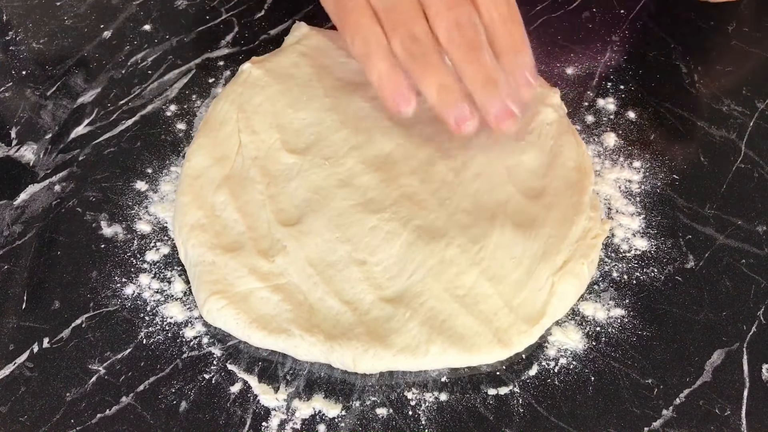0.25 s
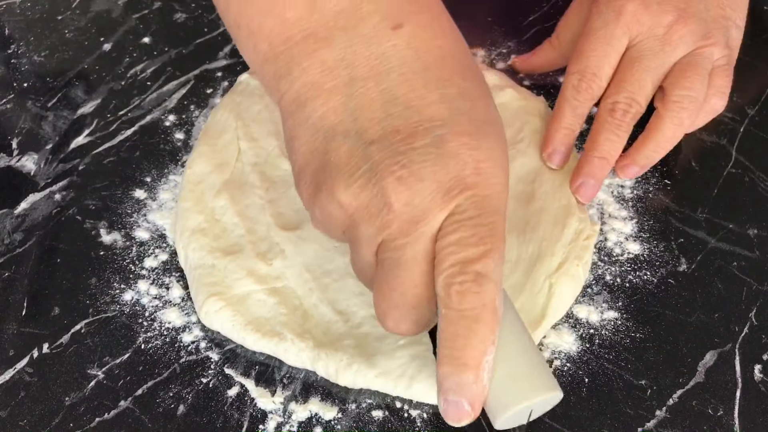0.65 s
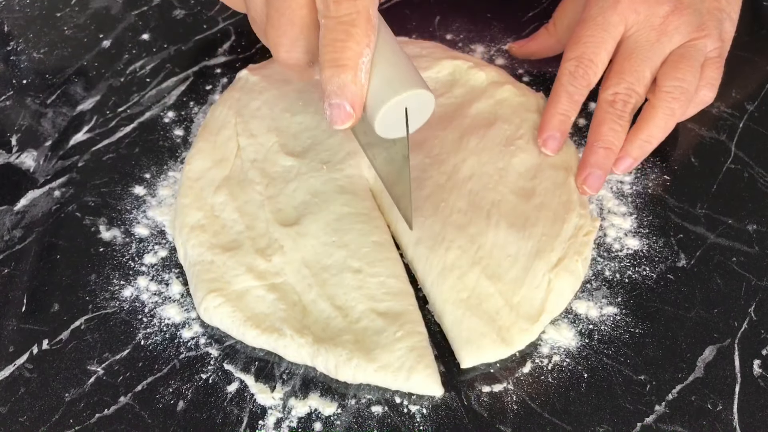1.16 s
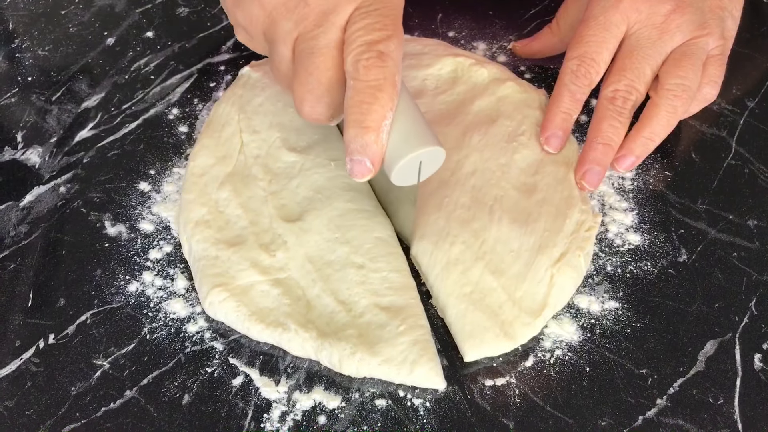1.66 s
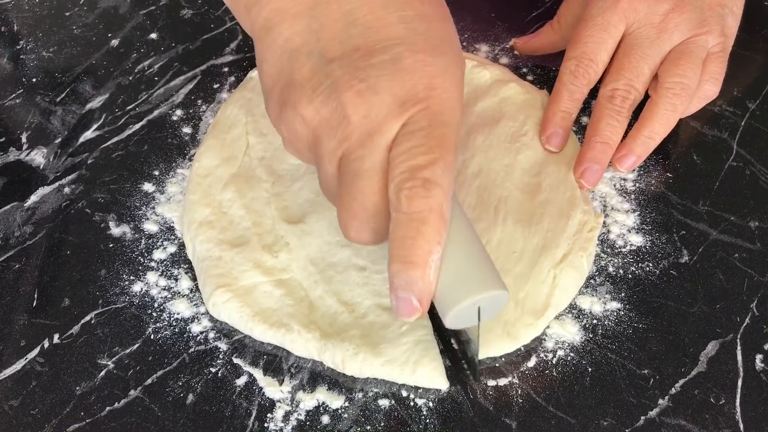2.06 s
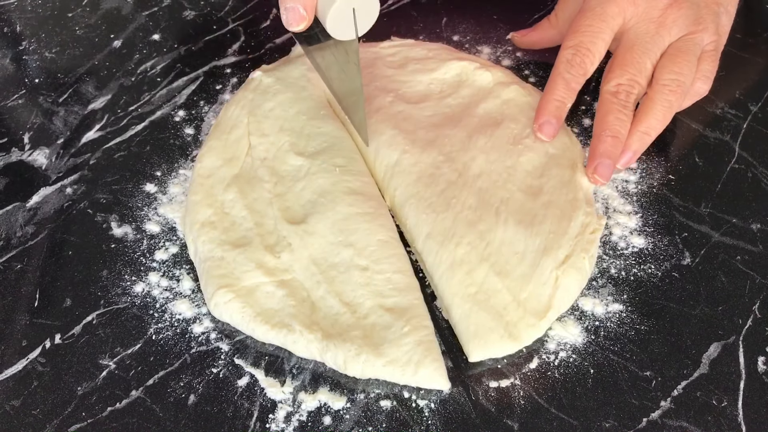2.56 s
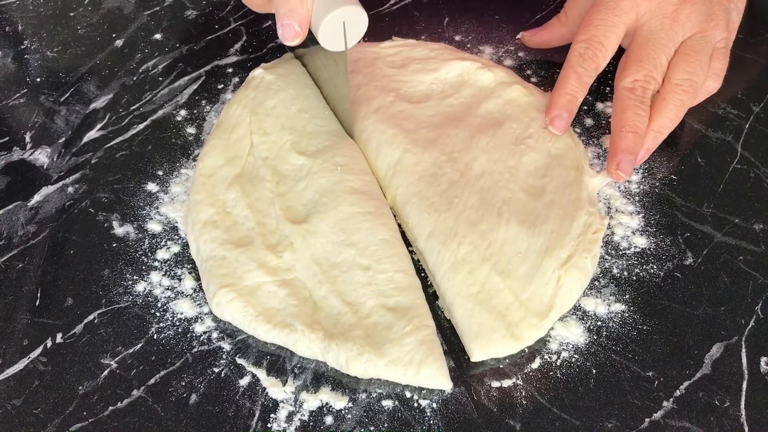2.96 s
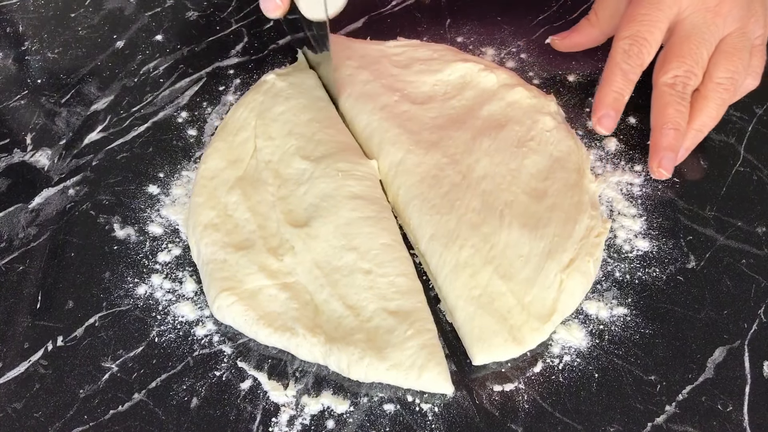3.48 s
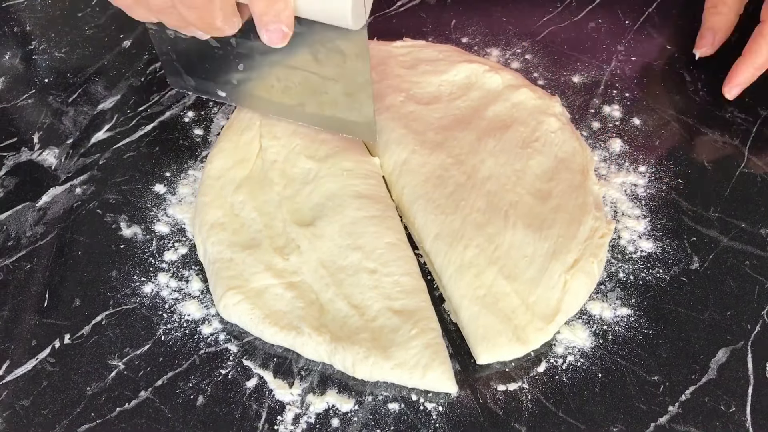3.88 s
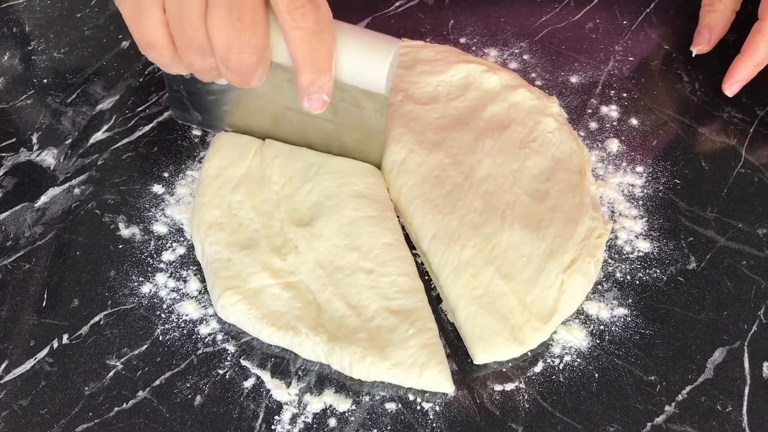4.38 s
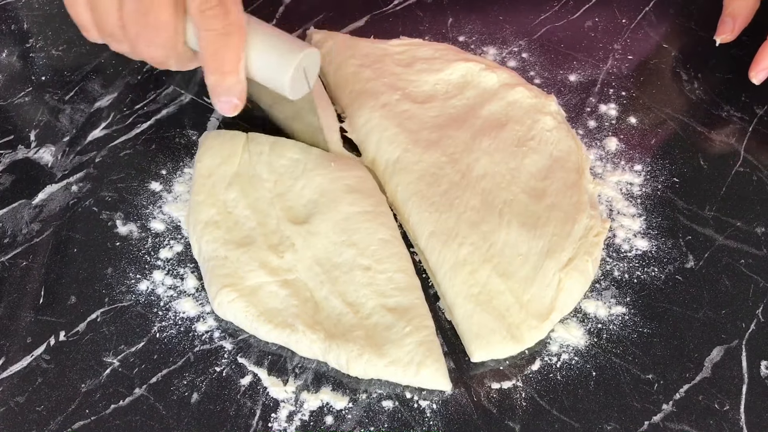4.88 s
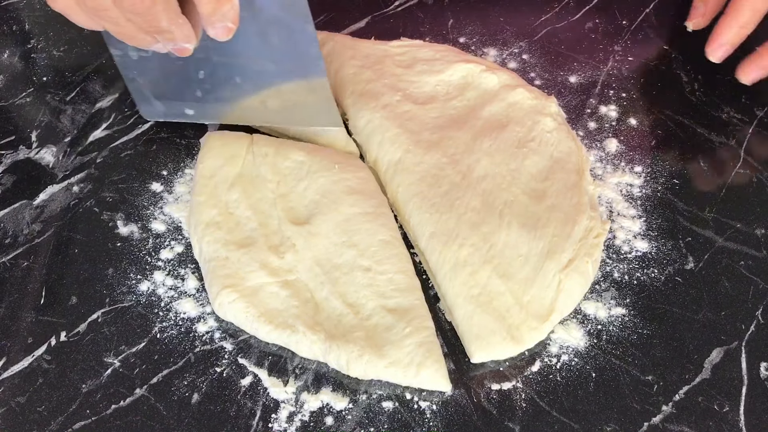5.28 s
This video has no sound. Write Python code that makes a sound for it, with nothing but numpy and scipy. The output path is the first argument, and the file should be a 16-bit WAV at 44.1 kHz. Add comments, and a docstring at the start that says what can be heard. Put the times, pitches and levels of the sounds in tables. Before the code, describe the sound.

A soft pat opens, followed by quick dry swishes of a blade through floured dough and a smoother fading slide. One sharp knock stands far above the rest, then come scrapes, a lighter tap at three seconds, a cluster of muffled bumps and sticky clicks, and a short metallic scratch near the end. Close microphone, small room, quiet appliance hum.

```python
"""A steel bench scraper cuts soft dough on a floured stone counter in a quiet kitchen.
Quick drags open the scene as grain friction through moving resonances; the flat blade then slides out.
One hard knock at 1.6 s rings the counter's decaying modes, more drags follow, and soft knocks crowd the end.
Near 5.2 s the bare blade slides free and slips on stone ring its plate modes, before the last drags.
Under it all lie fluttering low noise, an appliance hum and hiss, made of filtered noise."""
import sys
import numpy as np
from scipy import signal
from scipy.fft import rfft, irfft, next_fast_len
from scipy.io import wavfile
from scipy.ndimage import uniform_filter1d

SR = 44100
rng = np.random.default_rng(int(sys.argv[2]) if len(sys.argv) > 2 else 0)


def file_out(sig):
    """Save sig as 16-bit WAV at sys.argv[1]."""
    # one column per channel
    cols = np.atleast_2d(sig).T
    # limit, then scale
    lim = np.clip(cols, -1, 1)
    pcm = np.round(lim * 32767).astype(np.int16)
    wavfile.write(sys.argv[1], SR, pcm)


N = 244314


def drags():
    """Granular friction: grain noise through a moving bright resonance, part of it ringing the blade."""
    # Strokes over dough and flour, and the noisy tails of the pat at 0.056 s and the knock at 1.645 s. Each
    # row: time the top is reached, rise for 20 dB, hold and fall for 20 dB in seconds, hiss level in dB, dull
    # rub, counter body and blade ring in dB re hiss, bright resonance in Hz, rasp and treble from 8.6 to 14 kHz
    # in dB re hiss.
    drag_rows = [(0.001, .01, 0.0043, 0.1, -66, -2, 2, -11, 3870, -3, -9),
                 (0.056, 0.0068, 0.0019, 0.069, -58.5, -3, -2.5, -25, 4230, -5, -8),
                 (0.115, .05, 0.066, 0.12, -70.5, 9, 3, -13, 4300, -1, -8),
                 (0.2, 0.075, .03, 0.06, -74, -6, -1, -7, 4700, 7, -13),
                 (0.296, 0.17, 0.024, 0.0069, -57, -12.5, -9.5, -5.5, 4940, -7, -11.5),
                 (0.35, 0.027, 0.0081, 0.073, -71.5, 3, -7, -6, 4250, -1, -7),
                 (0.527, 0.1, 0.018, 0.097, -57, 2, -5, -2.5, 3040, 0.5, -8.5),
                 (0.575, .04, .01, 0.053, -59, -8, -9, -13, 5000, -5, -13),
                 (0.65, 0.12, .015, 0.07, -61.5, -3.5, -5, -5, 4020, -2, -12),
                 (0.725, 0.057, 0.017, 0.037, -65, -3, -2.5, -1, 3730, -2.5, -5),
                 (1.624, 0.099, 0.014, .02, -72, 4, 9.5, -5, 4000, -5, -10),
                 (1.659, 0.034, .005, 0.22, -63, 0, 15.5, -19, 3200, 6.5, -16),
                 (1.789, 0.13, 0.0053, 0.086, -65.5, -1, 7.5, -12, 4470, 1.5, -7.5),
                 (1.855, 0.038, 0.061, 0.079, -60.5, -6, 1, -5, 3960, -5, -9.5),
                 (1.956, 0.15, 0.074, 0.064, -58.5, 3, 2.5, -9, 3680, -0.5, -11),
                 (2.044, 0.056, 0.087, 0.041, -66.5, 1.5, -2, -4, 3760, 0.5, -10),
                 (3.177, 0.19, 0.044, 0.076, -60, -3.5, -1.5, -8, 4130, -3, -12.5),
                 (3.356, 0.07, 0.023, 0.31, -60, 1.5, -1, -13, 4160, 0, -13),
                 (3.44, 0.037, 0.047, 0.12, -50.5, -5.5, -10, -8, 4330, -5.5, -10),
                 (3.53, 0.093, 0.051, 0.02, -52.5, -4, -10, -20, 6240, -6, -7),
                 (3.619, 0.048, .004, 0.1, -55, -4.5, -0.5, -11, 4230, -9, -9.5),
                 (3.7, 0.13, 0.08, 0.14, -73.5, 3, 0, 2, 4170, 4, -12),
                 (3.868, 0.18, 0.042, 0.013, -72, 5.5, -1, -20, 3999, 2.5, -11),
                 (3.954, .1, 0.16, .1, -97, 2, -8, 1, 4000, -4, -10),
                 (4.286, 0.19, 0.23, 0.11, -76.5, -7, 7.5, -4, 4335, -10, -7),
                 (4.611, 0.085, 0.055, 0.09, -67.5, -3, 5, -15, 3160, 3, -10.5),
                 (4.72, 0.033, 0.0082, 0.11, -65.5, 2, 7, -13, 3500, 3.5, -23),
                 (4.82, 0.053, 0.082, 0.046, -61.5, 0.5, 1.5, -4, 5350, -0.5, -5),
                 (4.99, 0.28, 0.012, 0.047, -61.5, 2.5, 2, -11, 4000, 0, -13),
                 (5.036, 0.055, 0.07, .05, -66, 1, 5, -27, 3670, 3, -13),
                 (5.129, 0.1, 0.022, 0.07, -58.5, -5.5, -3.5, -13, 4300, -3, -9.5),
                 (5.279, 0.075, .01, 0.18, -63.5, -4, -1.5, -10, 3320, -2.5, -14),
                 (5.53, 0.3, .01, .1, -66, -8, -0.5, -4.5, 4870, -2, -6.5)]
    # Spectrum of the friction. Each row: frequency in Hz, relative level in dB per Hz.
    drag_colour = [(240, 2.5), (400, -2), (570, -1.5), (826, 0.5), (1400, 3.5), (2180, -7), (2550, -5),
                   (2800, -1.5), (4050, -2), (5600, -3.5), (7170, -6.5), (8370, -12), (12700, -21),
                   (16000, -14)]
    resonance_db, resonance_octaves = 13.5, 1.04   # height and spread of the bright resonance

    power = strokes(drag_rows) ** 2
    total = power.sum(axis=0)
    # the mean weighted by power lets the loudest stroke set the colour
    colour = np.transpose(drag_rows)[5:] @ power / total
    dull_db, body_db, ring_db, centre_hz, rasp_db, treble_db = map(every_sample, colour)
    friction = coloured(grains(12000, uneven_db=2.5), drag_colour)

    hiss = 0
    edges = np.geomspace(2200, 7800, num=10)
    for low, high in zip(edges, edges[1:]):
        # the free length of blade sets which range stands out
        octaves = np.log2(np.sqrt(low * high) / np.maximum(centre_hz, 1))
        lift_db = resonance_db * np.exp(-(octaves / resonance_octaves) ** 2)
        hiss = hiss + amp(lift_db + 1.1 * drift(25)) * band(friction, low, high)
    # even out the hiss over 4000 samples, then let it flicker
    hiss_level = np.sqrt(uniform_filter1d(hiss ** 2, size=4000) + 1e-12)
    layers = amp(1.9 * drift(32)) * hiss / hiss_level
    layers += amp(dull_db + 1.3 * drift(13.0)) * rms_one(band(friction, 840, 1456))
    layers += amp(rasp_db + 1.14 * drift(17)) * rms_one(band(friction, 1503, 2345))
    layers += amp(body_db + 1.0 * drift(7.3)) * rms_one(band(friction, 358, 923))
    layers += amp(treble_db + 1.8 * drift(32)) * rms_one(band(friction, 8560, 14100))
    layers += amp(ring_db) * rms_one(blade(grains(6000, uneven_db=2.0)))
    return every_sample(np.sqrt(total)) * layers


def singing():
    """Resonance under friction: held by dough, the dragged blade sings briefly in narrow ranges."""
    # Each row: time the top is reached, rise for 20 dB, hold and fall for 20 dB in seconds,
    # level in dB, centre in Hz, width in Hz.
    sung_rows = [(0.26, 0.055, .04, 0.019, -68, 4700, 69), (0.51, .02, 0.043, 0.033, -64, 1400, 120),
                 (0.57, .03, 0.029, .04, -76, 1900, 40), (0.52, .03, 0.031, .04, -63, 2400, 220),
                 (0.55, .04, .04, .03, -70, 4200, 140), (0.5, .03, 0.059, .06, -63, 5700, 250),
                 (0.68, 0.018, 0.013, 0.018, -71, 2800, 290), (1.87, .02, .02, .03, -68, 3500, 200),
                 (1.976, 0.044, 0.022, .05, -59, 915, 110), (2.013, 0.018, .015, 0.026, -61, 3320, 130),
                 (1.988, .05, 0.037, .04, -65, 4600, 150), (3.195, 0.11, 0.024, 0.044, -80, 1800, 180),
                 (3.435, 0.034, .05, .05, -60, 1700, 200), (3.345, .03, .03, .05, -66, 4440, 200),
                 (3.433, .02, 0.024, .04, -60, 2470, 100), (3.442, .02, .05, .04, -63, 3900, 55),
                 (3.435, 0.018, 0.044, 0.033, -55.5, 4300, 60), (3.435, 0.023, 0.017, .03, -62, 6500, 91),
                 (3.517, .03, 0.051, .03, -68, 5900, 120), (3.518, .02, 0.045, 0.028, -62, 6800, 300),
                 (4.82, .02, .03, .04, -70, 5720, 200), (4.83, .03, 0.098, .03, -71, 2400, 550),
                 (4.86, .05, 0.054, .03, -71, 6600, 300), (4.89, .03, .03, .03, -68, 3000, 130),
                 (4.99, .02, .02, .03, -70, 4400, 180), (4.53, 0.033, 0.047, 0.026, -69, 760, 65),
                 (3.63, .015, 0.018, 0.045, -74, 1850, 170), (5.07, .03, .08, .03, -67, 4300, 150),
                 (4.76, 0.026, 0.036, .03, -62, 600, 160)]
    friction = grains(9000, uneven_db=2.0)
    out = np.zeros(N)
    for gain, (*_, hz, width_hz) in zip(strokes(sung_rows), sung_rows):
        tone = ring(friction, hz, t60_of_width(max(width_hz, 10)))
        out += every_sample(gain) * rms_one(tone)
    return out


def slides():
    """Smooth friction: noise in a few steady resonances as the flat of the blade leaves the cut faces."""
    # Each row: time the top is reached, rise for 20 dB, hold and fall for 20 dB in seconds, level in dB.
    slide_rows = [(0.78, 0.026, 0.31, 0.28, -68), (2.38, 0.93, 0.072, 0.14, -73.5)]
    # Each row: resonance in Hz, width in Hz, relative level in dB.
    slide_colour = [(1060, 490, 4), (2560, 430, -1.5), (4170, 450, -1.5), (6000, 620, -7)]
    noise = rng.standard_normal(N)
    tones = np.zeros(N)
    for k, (hz, width_hz, db) in enumerate(slide_colour):
        tones += (-1) ** k * amp(db) * rms_one(ring(noise, hz, t60_of_width(width_hz)))
    return every_sample(strokes(slide_rows).sum(axis=0)) * rms_one(tones)


def zing():
    """Stick-slip of bare steel on stone: dense slips ring every plate mode, with raw scratch between."""
    # The free blade slides along the stone. Each row: time in seconds, ring level in dB.
    zing_level = [(5.185, -82), (5.198, -64), (5.208, -53), (5.214, -52), (5.217, -46), (5.229, -47),
                  (5.2325, -35), (5.237, -46.5), (5.244, -43.5), (5.254, -45), (5.262, -54), (5.285, -78)]
    slips = grains(8000, uneven_db=2.0)
    gain = amp(in_time(zing_level, -130)[0])
    ringing = blade(gain * slips) / np.std(blade(slips))
    scratch = amp(-19.0) * gain * rms_one(band(slips, 2500, 11400))
    return ringing + scratch


def blade(x):
    """Modal plate: the steel's resonances ring in parallel, signs alternating."""
    # Each row: mode in Hz, width in Hz, relative level in dB.
    plate_modes = [(531, 11, -9), (805, 37, -9.5), (1156, 46, -10), (1600, 41, -19), (1792, 22, -8.5),
                   (2073, 24, -8), (2257, 50, -7.5), (2610, 47, -4.5), (3045, 54, -7), (3220, 38, -4),
                   (3676, 37, -12.5), (3680, 20, -0.5), (4000, 15, -10), (4090, 29, -2.5), (4450, 150, -7),
                   (4430, 33, -15.5), (4860, 44, -1.5), (5090, 14, -8.5), (5225, 43, 0), (5470, 42, -10),
                   (5535, 40, -3.5), (5780, 120, -25), (6045, 47, -6), (6360, 100, -8), (7100, 30, -13),
                   (7500, 52, -9), (8600, 66, -28), (9130, 36, -15.5), (10000, 35, -24), (10300, 32, -26)]
    out = np.zeros(N)
    for k, (hz, width_hz, db) in enumerate(plate_modes):
        # the root of the width gives narrow and wide modes like power under noise
        out += (-1) ** k * amp(db) * np.sqrt(width_hz) * ring(x, hz, t60_of_width(width_hz))
    return out


def knocks():
    """Modal impact: blows ring counter and handle; longer contact dulls them and dough damps them."""
    # Edge on counter. Each row: start in seconds, relative level of the blow in dB, relative level of
    # the tick in dB re the blow, contact in ms, t60 of damping by dough in seconds, favoured pitch in Hz.
    knock_rows = [(0.056, -49.5, -10.5, 2, 0.043, 397), (0.318, -50.5, -22, 0.71, 0.19, 603),
                  (1.645, -21, -28, 0.43, 0.58, 426), (1.6522, -40, -33, 0.68, 0.047, 740),
                  (1.987, -41.5, -30, 0.91, 0.29, 560), (2.497, -48.5, -35, 1.42, 0.18, 610),
                  (3.005, -33.5, -35.5, 1.7, 0.32, 526), (3.627, -40.5, -18, 1.01, 0.16, 570),
                  (4.275, -47, -41, 1.6, 0.088, 486), (4.29, -38.5, -36, 2.7, 0.45, 434),
                  (4.424, -46, -35, 2, 0.11, 540), (4.438, -40, -35, 2.1, 0.072, 647),
                  (4.469, -42.5, -26.5, 1.5, 0.032, 610), (4.7035, -47.5, -30, 1.2, 0.04, 695),
                  (4.7235, -43.5, -23, 1.3, 0.17, 570), (4.74, -53, -30, 1.1, 0.11, 530),
                  (4.797, -46.5, -32, 1.1, 0.085, 690), (4.883, -48, -27, 0.68, 0.22, 550),
                  (5.004, -44.5, -18, 2, 0.13, 470), (5.033, -46, -17, 0.66, 0.24, 586)]
    # Counter and cabinet. Each row: mode in Hz, relative level in dB, t60 in seconds.
    counter_modes = [(208.5, -6.5, 0.22), (263, -8.5, 0.2), (418.2, 1, 0.5), (455.4, -7, 0.94),
                     (538, -0.5, 0.22), (662, -6, 0.53), (720, -18, 0.22), (758, -10, 0.26),
                     (768, -7, 0.83), (783, 2, 0.1), (883, -1, 0.15), (1010, -16, 0.083), (1083, -18, 0.13),
                     (1140, -17, 0.3), (1151, -11, 0.44), (1210, -14, 0.23), (1300, -11, 0.22),
                     (1480, -18, 0.2), (2350, -30, .06)]
    # Short knock of handle and blade. Each row: mode in Hz, relative level in dB, t60 in seconds.
    handle_modes = [(1120, 7, 0.016), (716, -5.5, 0.064), (1193, 6.5, 0.01), (293, -16, 0.064),
                    (1750, 0, 0.01), (2320, -13, 0.019), (1497, -3.5, 0.026), (3040, -18.5, 0.043),
                    (3930, -8, 0.015)]
    base_handle_db, handle_loss_db_per_ms = 16.5, 32   # the handle weakens as the contact softens
    # the more dough damps a blow, the more one pitch stands out
    free_t60_s, favour_db_per_halving, favour_octaves = 0.52, 4.5, 0.44

    out = np.zeros(N + SR)
    t = np.arange(SR // 3) / SR
    for s, db, _, contact_ms, damp_t60, favoured_hz in knock_rows:
        damp_t60 = max(damp_t60, .01)
        modes = np.array(counter_modes, float)
        # the spot that is hit favours the modes near one pitch
        favour_db = favour_db_per_halving * np.log2(free_t60_s / damp_t60)
        octaves = np.log2(modes[:, 0] / favoured_hz)
        modes[:, 1] += favour_db * (2 * np.exp(-(octaves / favour_octaves) ** 2) - 1)
        blow = amp(-14.0) * struck(modes, t, spread_db=-0.9) * amp(-60 * t / damp_t60)
        handle_db = base_handle_db - handle_loss_db_per_ms * contact_ms
        onset = 1 - np.exp(-t / 0.0013)
        blow += amp(handle_db) * struck(handle_modes, t, spread_db=-0.1) * onset
        # the longer the contact, the lower the low-pass corner
        contact = signal.butter(2, 1e3 / max(contact_ms, .1), fs=SR, output="sos")
        blow = signal.sosfilt(contact, blow)
        out[round(s * SR):][:len(t)] -= amp(db) * blow   # the blow first swings downward
    s, db, tick_db = np.transpose(knock_rows)[:3]
    return out[:N] + tick(strikes(s, db + tick_db + 17.0))


def struck(modes, t, spread_db):
    """Modal superposition: decaying sines, signs alternating, strengths changing from blow to blow."""
    hz, db, t60 = np.transpose(modes)[:, :, None]
    signs = (-1) ** np.arange(len(hz))[:, None]
    strength = signs * amp(db + spread_db * rng.standard_normal(hz.shape))
    return np.sum(strength * amp(-60 * t / t60) * np.sin(2 * np.pi * hz * t), axis=0)


def tick(clicks):
    """Impulse response of an edge tick: a crack of milliseconds, a faint noisy tail, a little blade ring."""
    t = np.arange(SR // 5) / SR
    decay = np.exp(-t / 0.0014) + amp(-14) * np.exp(-t / 0.015)
    crack = rng.standard_normal(len(t)) * decay
    bright = band(signal.fftconvolve(clicks, crack)[:N], 1150, 5600)
    return band(bright, 730, 7000) + amp(-42.5) * blade(clicks)


def ticks():
    """Impulse excitation: edge ticks and dough letting go, each a crack plus a short pitched ping."""
    # Each row: start in seconds, relative level in dB, ring in Hz, t60 of the ring in seconds.
    tick_rows = [(0.9036, -61, 2544, 0.012), (1.789, -55, 4800, .02), (1.859, -61, 3550, .02),
                 (3.2667, -56, 4800, 0.0079), (3.005, -58, 3270, .015), (3.6283, -55, 3960, 0.17),
                 (3.634, -54, 3260, 0.096), (3.909, -67, 2330, .01), (4.121, -60, 5400, .01),
                 (4.565, -61, 2960, .03), (4.587, -61, 2940, .03), (4.608, -55, 2980, .02),
                 (4.6133, -50, 3080, 0.022), (4.631, -56, 3040, 0.013), (4.637, -49, 3050, 0.02),
                 (4.72, -57, 3420, .015), (4.656, -57, 2930, 0.018), (4.684, -56, 3100, .02),
                 (5.139, -51, 3570, 0.019), (5.1395, -50, 6200, .015), (5.2155, -51, 5170, .02),
                 (5.2315, -38, 3660, .03)]
    s, db = np.transpose(tick_rows)[:2]
    cracks = tick(strikes(s, db + 0.5))
    pings = sum(ring(strikes([s], db - 0.5), hz, t60) for s, db, hz, t60 in tick_rows)
    return cracks + pings


def snaps():
    """Sudden release: sticky dough parts with about a millisecond of thin, high crackle."""
    # Each row: start in seconds, relative level in dB.
    snap_rows = [(0.6315, -74), (1.6245, -61), (1.63, -57), (1.6365, -62), (1.6445, -52), (1.66, -62),
                 (2.9873, -59), (3.266, -67), (4.124, -57), (4.25, -60), (4.29, -66), (4.404, -63),
                 (4.471, -61), (4.485, -59), (4.6828, -58), (4.718, -58), (4.806, -62), (5.035, -55),
                 (5.2096, -51)]
    t = np.arange(SR // 100) / SR
    crack = rng.standard_normal(len(t)) * np.exp(-t / 0.00095)
    s, db = np.transpose(snap_rows)
    return band(signal.fftconvolve(strikes(s, db), crack)[:N], 3600, 15000)


def thumps():
    """Damped low resonance: the hand leans on the dough and the counter thumps."""
    # Each row: start in seconds, relative level in dB, pitch in Hz, t60 in seconds.
    thump_rows = [(.057, -29, 116, 0.011), (0.619, -46, 98.5, 0.15), (4.271, -48, 200, 0.12),
                  (4.297, -48, 232, 0.059), (4.349, -47.5, 229, 0.057), (4.546, -43, 58.6, 0.17),
                  (4.766, -48.5, 104, 0.13), (4.861, -42.5, 92, 0.092), (4.9, -49.5, 210, 0.094),
                  (5.02, -51, 225, 0.098)]
    pushes = sum(ring(strikes([s], db), hz, t60) for s, db, hz, t60 in thump_rows)
    return band(pushes, 33, 440)


def kitchen(x):
    """Reverberation by recirculation: ten parallel feedback delays, duller on every round."""
    t60_s, wall_cut_hz = 0.46, 2600
    size = next_fast_len(N + SR)
    w = 2 * np.pi * np.arange(size // 2 + 1) / size   # radians per sample
    dull = 1 / (1 + 1j * w * SR / (2 * np.pi * wall_cut_hz))
    response = 0
    for k, delay_s in enumerate(np.geomspace(.0083, .0347, num=10)):
        loop = amp(-60 * delay_s / t60_s) * dull * np.exp(-1j * w * delay_s * SR)
        response = response + (-1) ** k * loop / (1 - loop)
    return irfft(rfft(x, size) * response, size)[:N]


def background():
    """Filtered noise: broad room hiss, narrow hum bands and two bands of unsteady low noise."""
    # Spectrum of the room. Each row: frequency in Hz, relative level in dB per Hz.
    room_tone = [(26, -39), (45, -1), (55, -11.5), (92, -12.5), (234, -21), (284, -23.5), (321, -24.5),
                 (580, -30.5), (760, -32.5), (1020, -34), (1100, -36), (2940, -48), (3940, -45),
                 (14500, -55), (16000, -60)]
    # Appliance hum. Each row: centre in Hz, width in Hz, rms level in dB.
    hum_bands = [(101.27, 2.6, -63), (135.3, 3.7, -67.5), (213.3, 42, -65.5), (775, 33, -74)]
    # Random flutter of low noise near 27 Hz. Each row: time in seconds, rms level in dB.
    flutter_level = [(0.0, -30), (0.17, -59.5), (1.4, -54.5), (1.7, -53), (2.2, -49), (2.5, -61),
                     (2.98, -44.5), (3.01, -49.5), (4.66, -77), (4.69, -58.5), (5.45, -46.5), (5.54, -80)]
    room_db, deep_db, deep_swing_db = -57.5, -49, -0.5

    room = coloured(rng.standard_normal(N), room_tone)
    out = amp(room_db + 1.04 * drift(6.6)) * rms_one(room)
    for hz, width_hz, db in hum_bands:
        out += amp(db) * rms_one(ring(rng.standard_normal(N), hz, t60_of_width(width_hz)))
    low_noise = band(band(rng.standard_normal(N), 18.7, 32.4), 21.9, 37.2)
    out += amp(in_time(flutter_level, -55)[0]) * rms_one(low_noise)
    deep = band(band(rng.standard_normal(N), 4.3, 17.1), 4.46, 23.4)   # wavering
    return out + amp(deep_db + deep_swing_db * drift(5.4)) * rms_one(deep)


def strokes(rows):
    """Envelope linear in dB: each stroke's gain at every 20th sample climbs, holds and dies away."""
    s, rise, hold, fall, db = np.transpose(rows)[:5, :, None]
    t = np.arange(0, N + 20, 20) / SR - s
    steps = np.maximum(np.maximum(-t / rise, (t - hold) / fall), 0)
    return amp(db - 20 * steps.clip(max=4.0))   # at most 80 dB down


def every_sample(coarse):
    """Linear interpolation between every 20th sample."""
    return np.interp(np.arange(N) / 20, np.arange(len(coarse)), coarse)


def grains(per_s, uneven_db):
    """Shot noise: random clicks of uneven size and either sign, as from flour grains; rms 1."""
    sizes = amp(uneven_db * np.minimum(rng.exponential(1, N), 4))
    signs = rng.choice([-1, 1], N)
    return rms_one(sizes * signs * (rng.random(N) < per_s / SR))


def strikes(times, db):
    """Impulse train: one click per event."""
    clicks = np.zeros(N)
    clicks[np.round(np.asarray(times) * SR).astype(int)] = amp(db)
    return clicks


def ring(x, hz, t60):
    """Two-pole resonator: a unit click sets a decaying sine of height 1 ringing."""
    r = amp(-60 / (t60 * SR))
    w = 2 * np.pi * hz / SR
    return signal.lfilter([0, np.sin(w)], [1, -2 * r * np.cos(w), r * r], x + 1e-18)


def t60_of_width(width_hz):
    """Reciprocity of bandwidth and decay: the wider a resonance, the shorter its t60 in seconds."""
    return np.log(1000) / (np.pi * width_hz)


def drift(rate):
    """Low-passed chance: slow random motion of rms 1, cornering at rate Hz, drawn at every 40th sample."""
    r = np.exp(-80 * np.pi * rate / SR)
    chance = rng.standard_normal(N // 40 + 2002)
    slow = signal.lfilter([1], [1, -2 * r, r * r], chance)[2000:]   # skip the settling
    return np.interp(np.arange(N) / 40, np.arange(len(slow)), rms_one(slow))


def coloured(x, spectrum):
    """Spectral shaping: give a white signal a spectrum in dB per Hz, straight over log frequency."""
    size = next_fast_len(N)
    hz, db = np.transpose(spectrum)
    at = np.log(np.arange(size // 2 + 1) * SR / size + 1)
    gain = amp(np.interp(at, np.log(hz), db, -120, -120))
    return irfft(rfft(x, size) * gain, size)[:N]


def band(x, low_hz, high_hz):
    """Band limitation by a Butterworth band-pass."""
    sos = signal.butter(2, [low_hz, min(high_hz, .45 * SR)], "band", fs=SR, output="sos")
    return signal.sosfilt(sos, x)


def in_time(rows, outside):
    """Linear interpolation of columns over time, with a set value outside the rows."""
    s, *columns = np.transpose(rows)
    return np.array([np.interp(np.arange(N) / SR, s, c, outside, outside) for c in columns])


def amp(db):
    """Logarithmic level: decibels to gain."""
    return 10 ** (np.asarray(db) / 20)


def rms_one(x):
    """Power normalisation: scale to rms 1."""
    return x / np.sqrt(np.mean(x ** 2) + 1e-20)


def scene():
    """Superposition: scraper sounds and their room echo over the background."""
    near = drags() + slides() + singing() + zing() + knocks() + ticks() + snaps() + thumps()
    echo = amp(-23.5) * kitchen(near)
    return (near + echo + background())[None]


def record(dry):
    """Band limitation: a steep low-pass, 60 dB down from 16.1 kHz upward."""
    return signal.sosfilt(signal.cheby2(16, 60, 16100, fs=SR, output="sos"), dry)


dry = scene()
out = record(dry)
file_out(out)
```